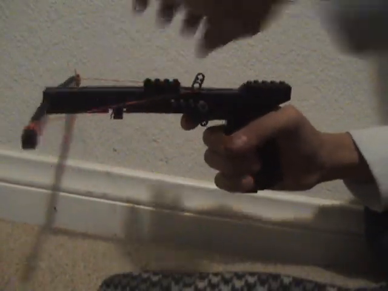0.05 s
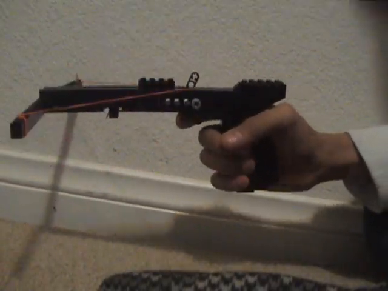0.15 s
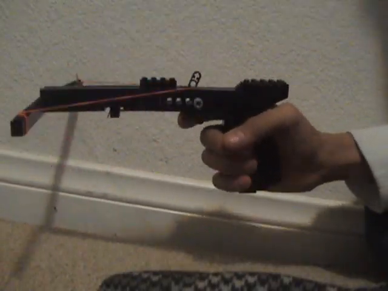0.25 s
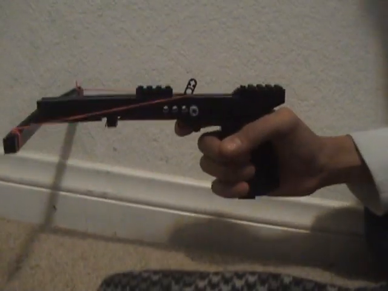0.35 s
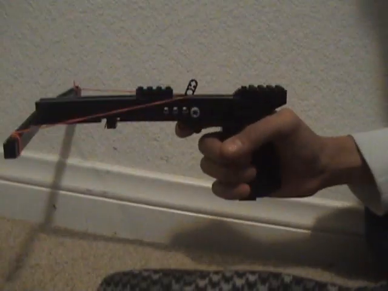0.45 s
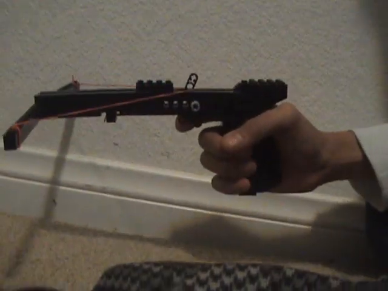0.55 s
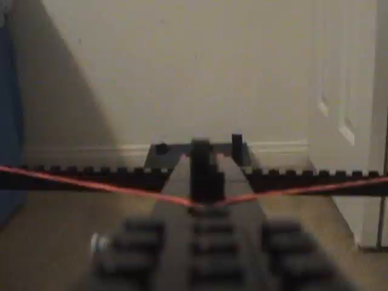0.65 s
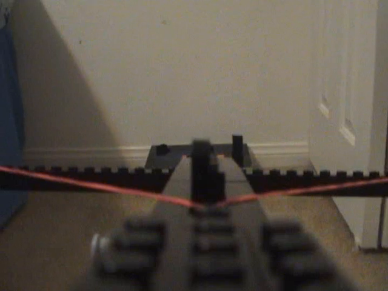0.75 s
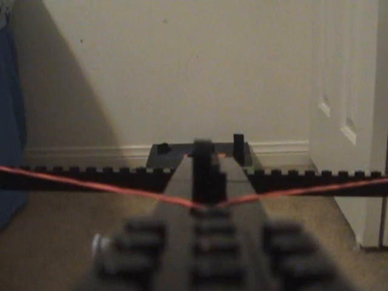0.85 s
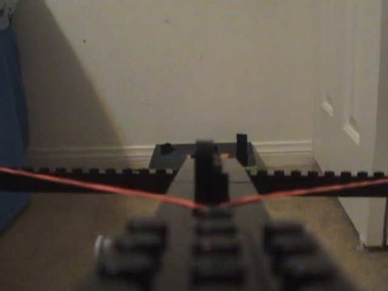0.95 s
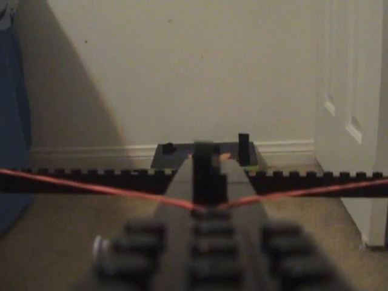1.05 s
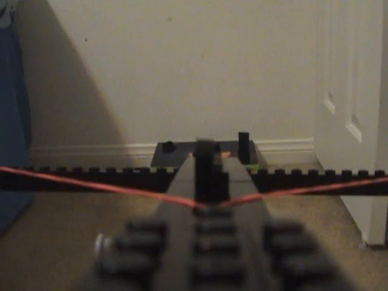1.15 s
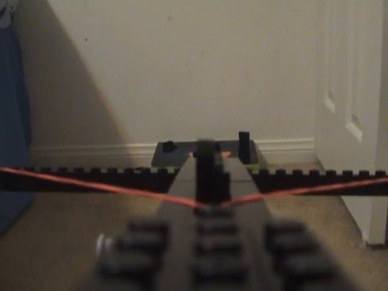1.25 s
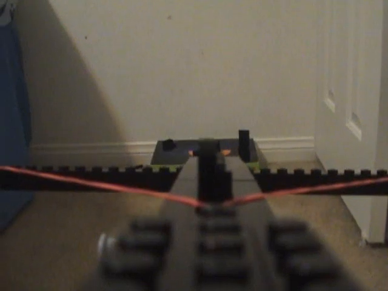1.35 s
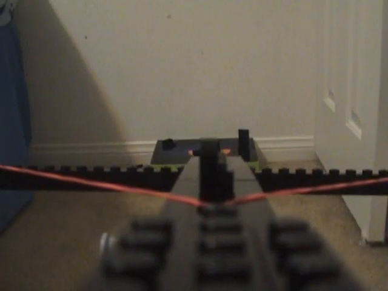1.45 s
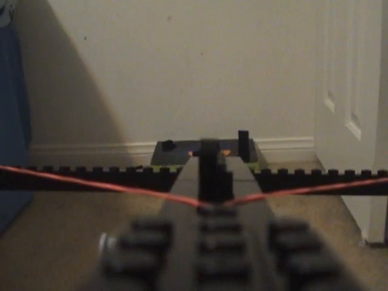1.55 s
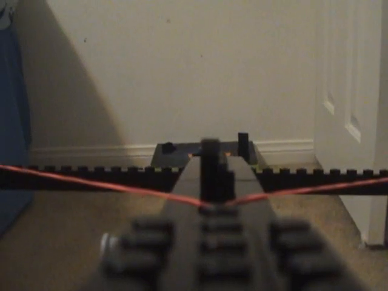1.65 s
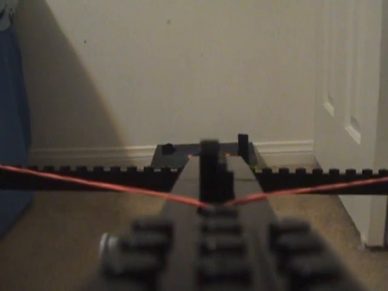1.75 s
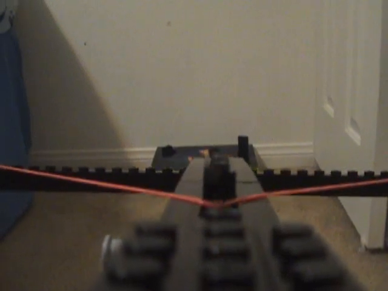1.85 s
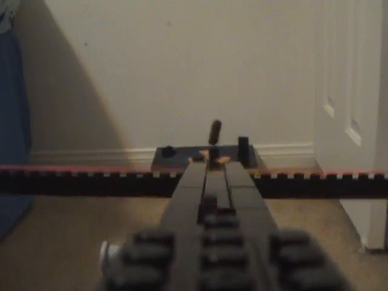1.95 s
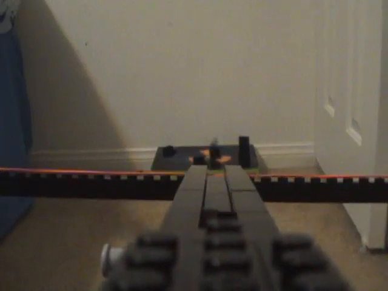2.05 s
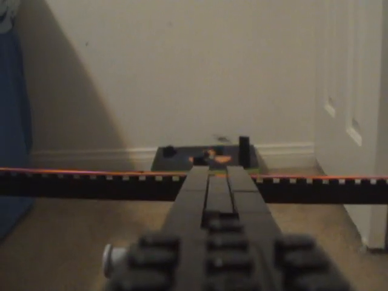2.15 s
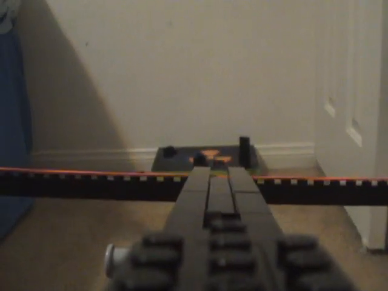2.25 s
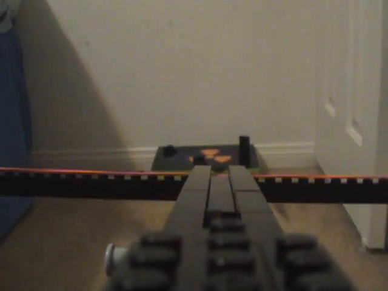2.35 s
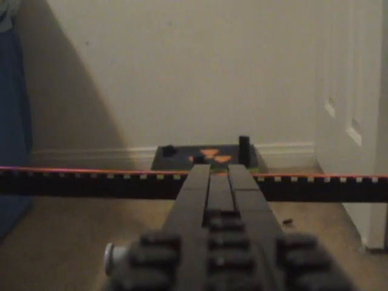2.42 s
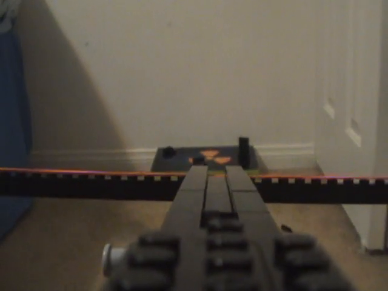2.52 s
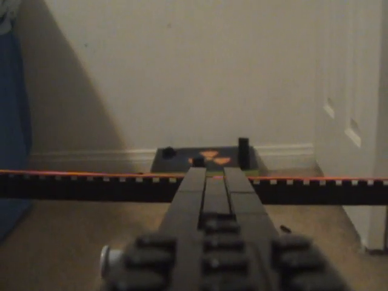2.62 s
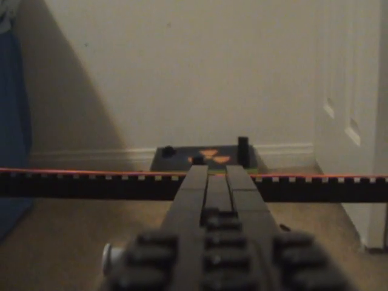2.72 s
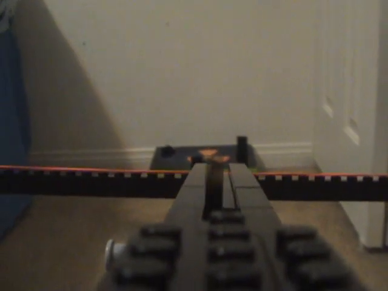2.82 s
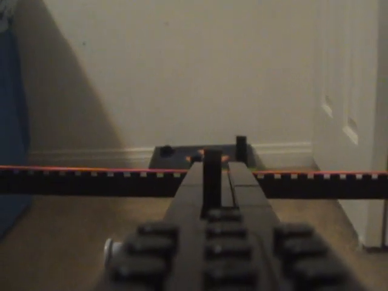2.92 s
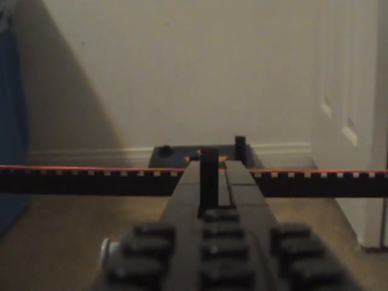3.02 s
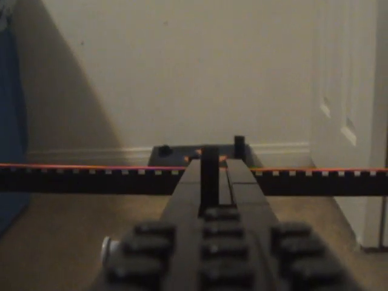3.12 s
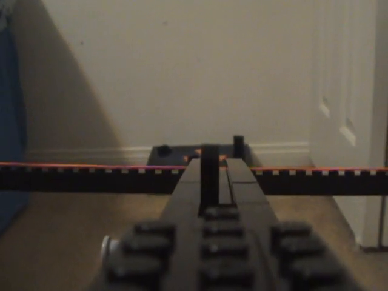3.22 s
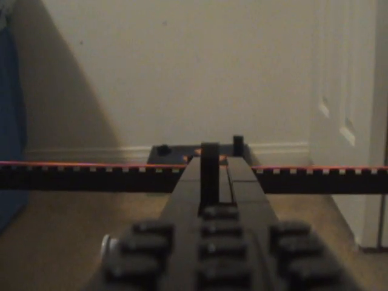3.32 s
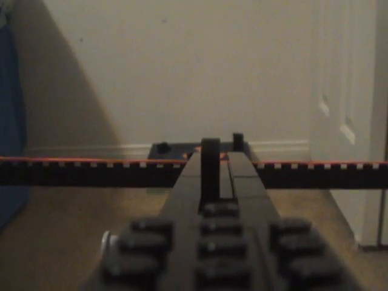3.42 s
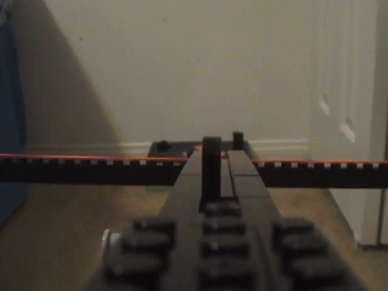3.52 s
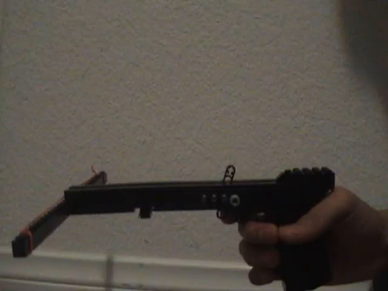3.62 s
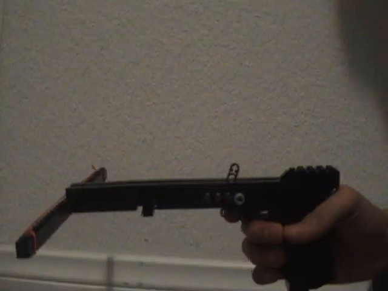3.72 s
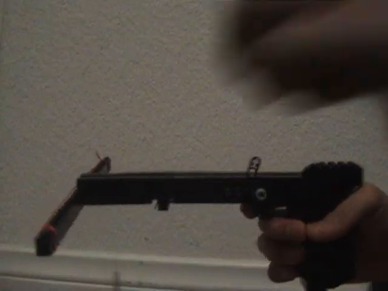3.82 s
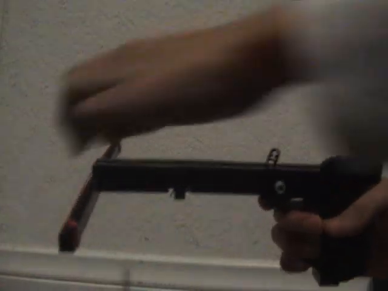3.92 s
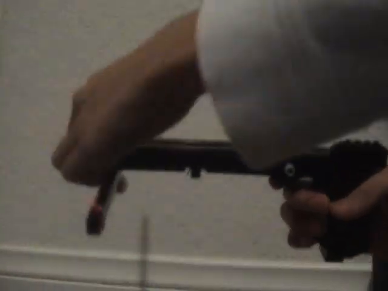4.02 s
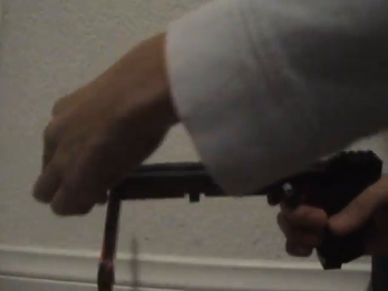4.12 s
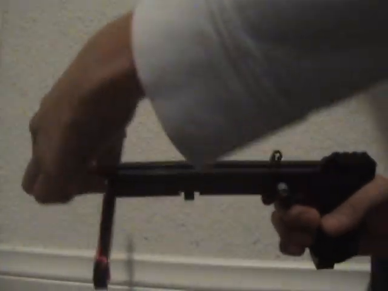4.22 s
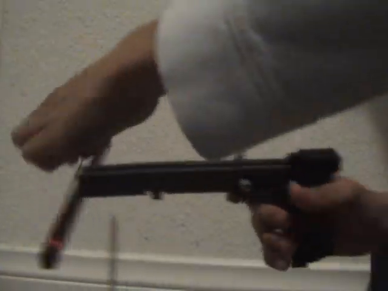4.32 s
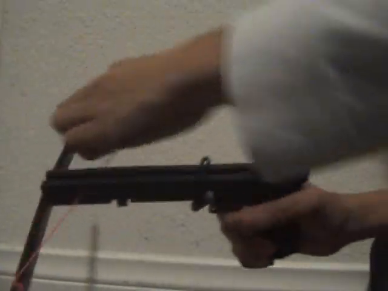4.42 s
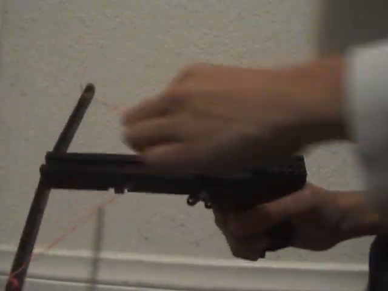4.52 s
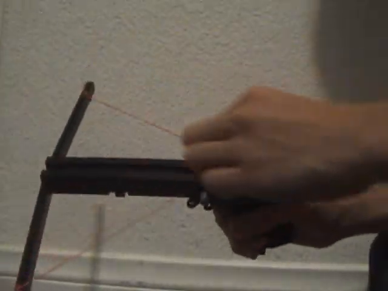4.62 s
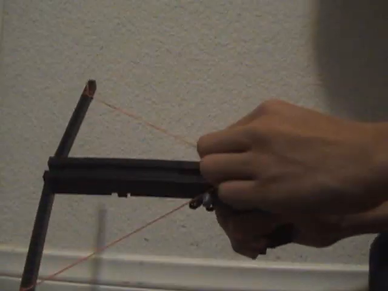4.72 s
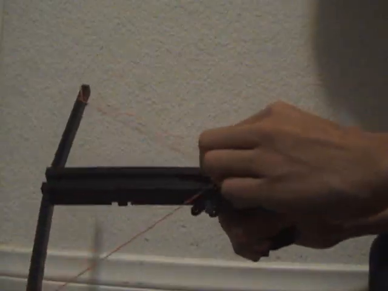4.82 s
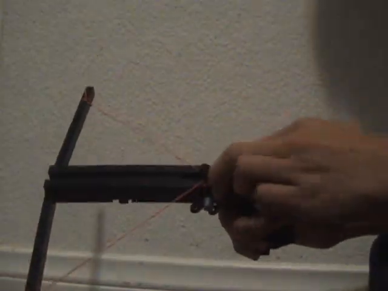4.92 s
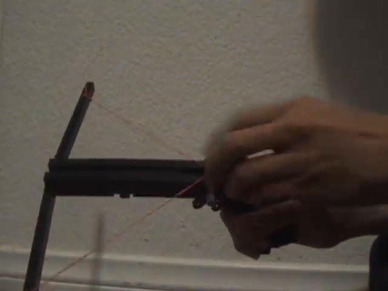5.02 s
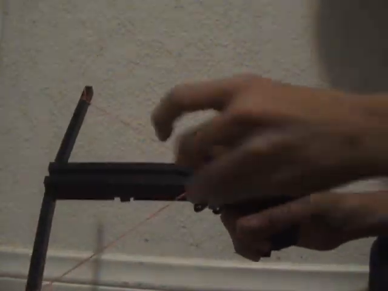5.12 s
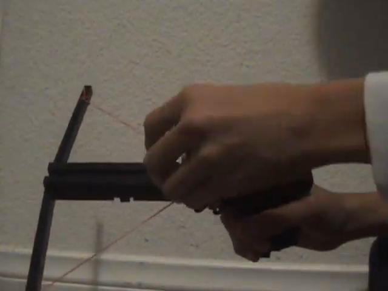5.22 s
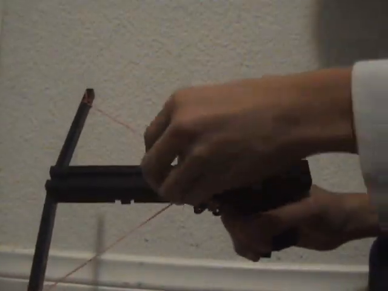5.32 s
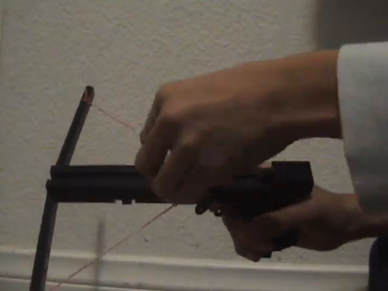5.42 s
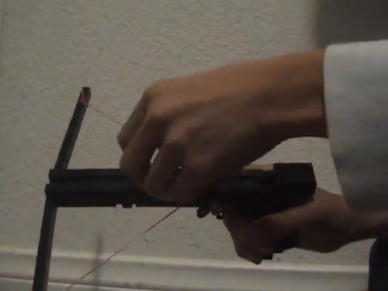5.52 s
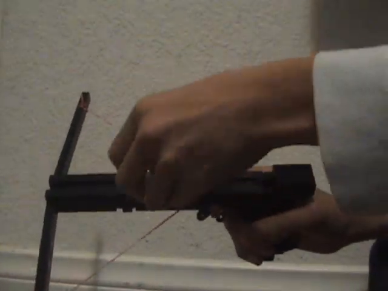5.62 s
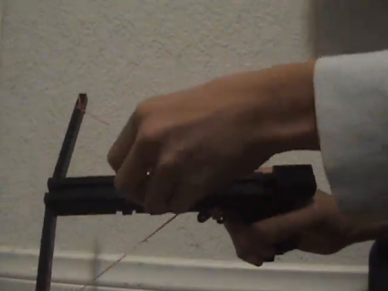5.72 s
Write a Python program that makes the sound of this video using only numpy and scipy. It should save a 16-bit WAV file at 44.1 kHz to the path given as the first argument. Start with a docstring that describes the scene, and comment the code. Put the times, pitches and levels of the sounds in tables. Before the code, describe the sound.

Steady hiss and low rumble of a cheap camera microphone in a small carpeted room. From 0 s, a sleeve rub and light plastic clicks and dull taps; a hard knock with creak at 0.49 s and a clack at 0.68 s. Sound drops out from 0.71 to 0.82 s, returning with a pop. A thin high camera whine lasts until about 1.3 s, then soft rapid focus ticks from 1.5 to 1.85 s. Clicks at 1.84 and 1.91 s lead into a slide and a loud, sharp band slap around 2.0 s, with a faint hum. At 2.2 s plastic bricks crash at the target, bouncing and clattering loudly until 2.55 s, fading by 2.8 s. A strong plastic clack hits at 2.94 s, smaller clicks at 3.5 s. Another brief dropout at 3.71 s. Then sleeve rubs, notably at 4.5 and 5.6 s, and crisp light clicks, the loudest at 5.06 s.

```python
"""A toy crossbow of plastic bricks is handled, fired and cocked again in a small carpeted room.
Over camera hiss and rumble, sleeves rub and fingers click: noise swells and short noise bursts that ring plastic.
The camera whines (sines), pauses, then its focus motor ticks (dying sines).
The bolt slides, the band slaps the bow and hums, and the target bricks scatter, bounce and clatter.
More clicks and rubs follow as the bow is cocked, with a second pause on the way."""
import sys
import numpy as np
from scipy import signal
from scipy.fft import rfft, irfft, next_fast_len
from scipy.io import wavfile

SR = 44100
rng = np.random.default_rng(int(sys.argv[2]) if len(sys.argv) > 2 else 0)


def waveform_to_disk(signal):
    """Save audio, clipped to [-1, 1], as 16-bit WAV at the path in sys.argv[1]."""
    frames = np.transpose(np.atleast_2d(signal))
    scaled = np.clip(frames, -1, 1) * 32767
    samples = np.round(scaled).astype(np.int16)
    wavfile.write(sys.argv[1], SR, samples)


N = 254456

# Steady hiss and rumble of room and camera, as relative strength: pitch_hz, level_db (per Hz)
FLOOR_SPECTRUM = [(25, -26), (50, -12), (80, -14.5), (125, -4), (170, -14), (230, -14), (400, -16),
                  (1000, -20), (2000, -26.5), (2550, -25), (3500, -30.5), (7000, -36), (11000, -37.5),
                  (16000, -43.5)]
# How alike left and right are (1 same, 0 unrelated, -1 opposite; clipped there): pitch_hz, likeness
FLOOR_LIKENESS = [(60, 0.35), (150, 0.46), (380, -0.79), (950, -0.65), (2380, -0.43), (5980, 0.28),
                  (15000, -1.8)]
# How much louder the left is than the right in banded noise: pitch_hz, left_over_right_db
NOISE_BALANCE = [(60, 2.0), (200, 2.5), (400, 1.26), (8000, -1.4)]
# Tone of rubbing cloth, as relative strength: pitch_hz, level_db (per Hz)
CLOTH_SPECTRUM = [(400, -27), (900, -2), (2000, -1), (3800, -1.5), (6300, -1), (8000, -8.5), (12000, -22),
                  (16000, -37)]
# Sleeve and skin rubbing, each a bell-shaped swell: middle_s, cloth_db, skin_db, half_width_s
RUBS = [(.05, -49, -60, 0.053), (.4, -60.5, -66, 0.13), (1.59, -56.5, -64, 0.056), (3.57, -55, -58, .04),
        (4.03, -64, -61, .03), (4.12, -54, -66, .04), (4.22, -51, -56, .03), (4.52, -44, -64, .045),
        (4.71, -57, -57, .025), (5.04, -55, -68, 0.14), (5.21, -59.5, -58, .025), (5.45, -54, -66, 0.023),
        (5.58, -44, -60, 0.018), (5.71, -52.5, -60, .03)]
# The three tables of blows share their columns: start_s, peak_db, pitch_hz, thud_db, tick_db
# (peak is for the middle bands, before their loss away from the pitch; thud and tick are rms of the attack)
# Finger clicks and knocks on the frame
HANDLING_BLOWS = [(0.08, -34, 2500, -62, -49), (0.114, -37, 3100, -66, -52), (0.252, -32, 700, -30, -67),
                  (0.266, -37, 700, -28, -61), (0.296, -50, 700, -37, -60), (0.403, -43, 700, -56, -73),
                  (0.489, -6, 1450, -22, -22), (0.51, -29, 985, -33, -63), (0.552, -28, 1110, -40, -47),
                  (0.605, -33, 2120, -58, -63), (0.633, -36, 2120, -47, -60), (0.68, -15, 2170, -43, -29),
                  (1.15, -42, 670, -47, -66), (1.438, -31, 2380, -62, -49), (1.557, -32.5, 1200, -46, -58),
                  (1.775, -38, 1150, -48, -72), (1.839, -19, 2510, -58, -32), (1.913, -15, 2640, -39, -39),
                  (2.873, -41, 1430, -61, -51), (2.892, -38, 1390, -64, -51), (2.912, -23, 1850, -39, -46),
                  (2.939, -4, 1100, -60, -29), (2.958, -24, 2260, -60, -50), (3.312, -45, 1500, -45, -64),
                  (3.466, -29.5, 1170, -39, -61), (3.501, -16, 2300, -38, -39), (3.521, -20, 830, -25, -35),
                  (3.541, -28, 2100, -58, -71), (3.673, -25, 2350, -51, -54), (3.684, -18, 3750, -51, -28),
                  (3.824, -17, 6770, -55, -32), (3.956, -44, 711, -46, -70), (4.029, -44, 719, -58, -70),
                  (4.159, -26, 6290, -74, -40), (4.247, -30, 4060, -55, -41), (4.263, -24, 3800, -62, -42),
                  (4.312, -24, 6430, -53, -39), (4.696, -42, 1280, -56, -70), (4.714, -25, 4700, -65, -39),
                  (4.795, -35, 5530, -62, -52), (4.936, -32, 4540, -55, -45), (5.0645, -7, 5870, -57, -21),
                  (5.141, -30.5, 3310, -61, -41), (5.197, -44, 934, -66, -59), (5.363, -39, 2030, -50, -56),
                  (5.444, -34, 3830, -59, -52), (5.563, -27, 3340, -65, -38), (5.575, -23, 3230, -70, -43),
                  (5.69, -36, 3230, -55, -50), (5.702, -28.5, 4680, -50, -43)]
# Catch, sliding bolt and band slapping the bow
RELEASE_BLOWS = [(1.942, -18, 1391, -44, -33), (1.966, -1, 3140, -33, -14), (1.981, -8.5, 4500, -53, -24),
                 (2.011, 2, 2517, -28, -16), (2.016, 4, 2050, -32, -12), (2.025, -2.5, 4100, -41, -17),
                 (2.038, -7, 2000, -44, -31)]
# Bolt and bricks landing across the room
LANDING_BLOWS = [(2.194, 1, 2996, -27, -8), (2.201, 1, 6580, -34, -22), (2.215, -1, 3030, -32, -14),
                 (2.23, 0, 3600, -33, -23), (2.238, -1, 2900, -32, -28), (2.247, -4, 3300, -41, -34),
                 (2.26, -2, 3220, -34, -29), (2.287, -6, 2470, -27, -28), (2.321, 4, 5810, -35, -13),
                 (2.342, 1, 7000, -47, -17), (2.361, -4, 980, -24, -15), (2.375, -4, 2490, -38, -33),
                 (2.411, -8, 2520, -46, -19), (2.447, -2, 2540, -32, -14), (2.521, -4, 2740, -32, -17),
                 (2.544, -11, 5500, -36, -27), (2.588, -22, 1970, -30, -41), (2.611, -25, 1890, -53, -44),
                 (2.658, -33.5, 1200, -51, -62), (2.685, -26, 1950, -47, -46), (2.707, -32, 1950, -60, -56),
                 (2.748, -36, 1980, -61, -55), (2.818, -41, 1061, -50, -60)]
# Ringing tones of the crossbow frame: pitch_hz, level_db (relative), t60_s (time to fall 60 dB)
FRAME_MODES = [(200, -2, .06), (290, 0, .05), (420, -8, .04), (1063, 0, .02), (1700, -4, .012),
               (2100, -3, .014), (2570, -1, .014), (3300, -2, .01), (3900, -2, .01), (4800, -3, .006),
               (5700, -4, .005), (6590, -4, .01)]
# Ringing tones of the loose bricks: pitch_hz, level_db (relative), t60_s
BRICK_MODES = [(130, -5, .12), (217, -2, .08), (1000, -3, .04), (1900, -4, .04), (2495, 0, .05),
               (2740, 0, .03), (3050, -2, .02), (3700, -2, .015), (5500, -6, .035), (5800, -6, .03),
               (6580, -3, .035), (7050, -5, .03), (8150, -5, .03)]
# Thud, knock, clack and tick bands of a contact: low_hz, high_hz
BANDS_HZ = [(100, 650), (650, 1500), (1500, 4000), (4000, 16000)]
# Share of each of those bands that differs between the ears: one share a band
BAND_WIDTHS = [.33, .24, .16, .45]
# Range of skin noise: low_hz, high_hz
SKIN_HZ = [600, 1800]
# Camera whines: start_s, end_s, pitch_hz, level_db (rms, before a slow wobble)
WHINES = [(0.38, 0.71, 10110, -70), (0.83, 1.275, 10110, -60), (0.89, 0.925, 7865, -66),
          (0.925, 0.96, 6573, -57), (0.83, 1.90, 2525, -67), (2.7, 3.5, 2525, -71),
          (3.845, 3.865, 6573, -53), (3.80, 4.025, 10110, -63)]
# One run of focus motor steps: first_s, interval_s, first_pitch_hz, peak_db (before variation), t60_s
FOCUS_STEPS = (1.491, 0.0337, 2530, -41.0, .014)
# Parts creaking and sliding: loudest_s, drive_db, swell_s, fade_s (each the time for 30 dB)
CREAKS = [(.487, -28, .008, .05), (.56, -39, .04, 0.01), (.678, -40.5, 0.14, 0.04), (1.912, -35, .02, .01),
          (1.965, -28, 0.0644, .2), (2.02, -20, .02, 0.1), (2.914, -34, .04, 0.0366),
          (2.938, -30, 0.01, .08)]
# Tones of the stretched band after the slap: pitch_hz, peak_db (before a wobble), t60_s
BAND_TONES = [(300, -45, .4), (544, -34, .8), (1814, -39, .4)]
# Bricks tumbling, joined by straight lines: time_s, drive_db, treble_db (relative)
TUMBLE = [(2.196, -25.5, 4), (2.24, -19, -3), (2.3, -21, -8), (2.325, -25, 4), (2.46, -27, 1.5),
          (2.56, -36, -1.5), (2.6, -41, -1.5), (2.64, -52, -5), (2.78, -55, -4), (2.85, -66, -9)]
# Camera pauses: stop_s, hiss_end_s, return_s, fade_in_s
PAUSES = [(0.710, 0.762, 0.824, .02), (3.710, 3.738, 3.796, .006)]

FLOOR_DB = -47  # rms
SOFT_HZ, HIGH_IS_HARDER = 6000, .6  # top of a contact on a 2.5 kHz part; it rises with this power of the pitch
THIN_BELOW = .7  # a part radiates little under this share of its pitch
ABOVE_DB_PER_OCT = 7.5  # fall of a blow's middle bands above its pitch
THUD_HZ = 300  # the hand or the carpet behind a blow keeps its thud deep
# How long a contact chatters on a 2 kHz part; lower parts chatter longer by this power of the pitch
TAP_T60_S, SLAP_T60_S, LANDING_T60_S, LOW_LINGERS = .018, .1, .15, .4
TAP_BELOW_DB, SLAP_BELOW_DB, LANDING_BELOW_DB = 16, 12, 25  # fall per octave of the middle bands below the pitch
ROOM_T60_S, WALL_CUT_HZ = 0.19, 14000
FOCUS_SAG_HZ = 17  # each focus step rings this much lower than the last
SLAP_S = 2.02
FAR_CUT_HZ = 8500  # distance and carpet dull the target
PREAMP_HISS_DB, OVERLOAD = -66.0, .92
PAUSE_HISS_DB = -68.0  # before smoothing
POP_S, POP_DB = 0.8218, -14.0
CUTOFF_HZ = 16500  # 60 dB down from here up
BAND_FILTERS = [signal.butter(3, edges, "band", fs=SR, output="sos") for edges in BANDS_HZ]


def from_db(db):
    """Turn a level in dB into a gain."""
    return 10 ** (np.asarray(db) / 20)


def rms_one(x):
    """Scale a sound to rms 1."""
    return x / np.sqrt(np.mean(x ** 2) + 1e-20)


def in_time(rows, column):
    """Join a table column by straight lines; it is very low outside the table."""
    rows = np.array(rows)
    return np.interp(np.arange(N) / SR, rows[:, 0], rows[:, column], left=-120, right=-120)


def at_hz(points, hz):
    """Read a spectrum between its points, with pitch on a log axis."""
    points = np.array(points)
    return np.interp(np.log(hz), np.log(points[:, 0]), points[:, 1])


def sides(pan_db):
    """Left and right gains; a positive level difference favours the left."""
    return from_db(np.array([[.5], [-.5]]) * pan_db)


def drift(rate_hz):
    """Slow random wander of rms 1, made at every 40th sample and joined up."""
    r = np.exp(-80 * np.pi * rate_hz / SR)
    warm_up = 2000
    noise = rng.standard_normal(N // 40 + 2 + warm_up)
    slow = signal.lfilter([1], [1, -2 * r, r * r], noise)[warm_up:]
    return np.interp(np.arange(N) / 40, np.arange(len(slow)), rms_one(slow))


def ring(x, hz, t60):
    """A resonance: a unit click sets a dying sine of height 1 ringing."""
    r = from_db(-60 / (t60 * SR))
    w = 2 * np.pi * hz / SR
    return signal.lfilter([0, np.sin(w)], [1, -2 * r * np.cos(w), r * r], x + 1e-18)


def gritty(shape, grit_db):
    """Noise whose samples vary widely in size, as many small contacts do."""
    return rng.standard_normal(shape) * from_db(grit_db * rng.standard_normal(shape))


def banded_noise(spectrum, patchy_db, likeness):
    """Third-octave bands of stereo noise, each with its own level, flicker and likeness; rms 1."""
    out = 0
    together = drift(2.0)
    edges = 22 * 2 ** (np.arange(30) / 3)
    white = rng.standard_normal((2, 2, N))  # neighbouring bands get unrelated noise
    for k, (low, high) in enumerate(zip(edges, edges[1:])):
        if high < .8 * spectrum[0][0]:
            continue
        third_octave = signal.butter(2, [low, high], "band", fs=SR, output="sos")
        mid, side = signal.sosfilt(third_octave, white[k % 2])
        hz = np.sqrt(low * high)
        alike = np.clip(at_hz(likeness, hz), -1, 1)
        flicker_db = patchy_db * (.7 * together + drift(14.0))
        gain = from_db(at_hz(spectrum, hz) + flicker_db) * sides(at_hz(NOISE_BALANCE, hz))
        out = out + gain * (np.sqrt(1 + alike) * mid + np.sqrt(1 - alike) * side * [[1], [-1]])
    return rms_one(out)


def floor_noise():
    """Room and camera hiss and rumble: flickering noise that lasts throughout."""
    return from_db(FLOOR_DB) * banded_noise(FLOOR_SPECTRUM, 1.1, FLOOR_LIKENESS)


def rubbing():
    """Cloth noise and a duller, grainier skin noise under bell-shaped swells."""
    t = np.arange(N) / SR
    cloth, skin = np.zeros(N), np.zeros(N)
    for middle, cloth_db, skin_db, half_width in RUBS:
        swell = np.exp(-.5 * ((t - middle) / half_width) ** 2)
        cloth += from_db(cloth_db) * swell
        skin += from_db(skin_db) * swell
    skin_filter = signal.butter(2, SKIN_HZ, "band", fs=SR, output="sos")
    grain = rms_one(signal.sosfilt(skin_filter, gritty(N, grit_db=5.0)))
    cloth_noise = banded_noise(CLOTH_SPECTRUM, 1.5, [(500, .6), (9000, .5)])
    return cloth * cloth_noise + skin * from_db(3.0 * drift(30.0)) * grain


def split(x, struck_hz):
    """Thud, knock, clack and tick bands; plastic is soft, so the top slopes off."""
    top_hz = min(SOFT_HZ * (struck_hz / 2500) ** HIGH_IS_HARDER, 16000)
    soft = signal.lfilter(*signal.butter(3, top_hz, fs=SR), x)
    return [signal.sosfilt(band_filter, soft) for band_filter in BAND_FILTERS]


def body(x, modes, ring_db, struck_hz, focus_db):
    """The contact, coloured by the struck part, plus the modes; those far from its pitch answer less."""
    out = x + from_db(-9.5) * ring(x, struck_hz, 2.4 / struck_hz)  # a broad hump, a few cycles long
    for k, (hz, db, t60) in enumerate(modes):
        octaves_off = min(abs(np.log2(hz / struck_hz)), 1)
        gain = from_db(ring_db + db - focus_db * octaves_off)
        out = out + (-1) ** k * gain * ring(x, hz, t60)
    return out


def spread(x, modes, ring_db, struck_hz, focus_db):
    """Bands of a shared and a differing contact noise, ringing the body, as left and right."""
    bands = split(body(x, modes, ring_db, struck_hz, focus_db), struck_hz)
    return [mid + wide * side * [[1], [-1]] for (mid, side), wide in zip(bands, BAND_WIDTHS)]


def attack_rms(x):
    """Level of the first 6 ms, with left and right averaged."""
    return np.sqrt(np.mean(x[:, :SR * 6 // 1000].mean(axis=0) ** 2))


def blows(table, modes, t60, below_db, ring_db, focus_db, crack_db, pan_db=-0.8):
    """Each blow is a sharp crack and a dying burst of micro-contacts into the body."""
    size = round(SR * (.06 + t60))
    out = np.zeros((2, N + size))
    t = np.arange(size) / SR
    for start, peak_db, hz, thud_db, tick_db in table:
        chatter_t60 = max(t60 * (2000 / hz) ** LOW_LINGERS, .002)
        crack = from_db(crack_db - t / 0.00024)  # the first millisecond is the hardest
        fade = from_db(-60 * t / chatter_t60) + crack
        contacts = gritty((2, size), grit_db=0.0) * fade
        thud, knock, clack, tick = spread(contacts, modes, ring_db, hz, focus_db)
        thud = signal.lfilter(*signal.butter(1, THUD_HZ, fs=SR), thud)
        mix = from_db(thud_db) * thud / attack_rms(thud) + from_db(tick_db) * tick / attack_rms(tick)
        for part, (low, high) in zip((knock, clack), BANDS_HZ[1:3]):
            loss_db = below_db * max(np.log2(hz / high), 0) + ABOVE_DB_PER_OCT * max(np.log2(low / hz), 0)
            part = signal.lfilter(*signal.butter(2, THIN_BELOW * hz, "high", fs=SR), part)
            mix += from_db(peak_db - loss_db) * part / np.abs(part.mean(axis=0)).max()
        at = round(start * SR)
        out[:, at:at + size] += sides(pan_db) * mix
    return out[:, :N]


def handling():
    """Fingers click and knock on the frame: short contacts that ring it a little."""
    return blows(HANDLING_BLOWS, FRAME_MODES, TAP_T60_S, TAP_BELOW_DB,
                 ring_db=-15.0, focus_db=12.5, crack_db=5.0)


def room(x):
    """Echoes from six feedback delays a side, duller on every round, worked out as spectra."""
    size = next_fast_len(N + SR)
    w = 2 * np.pi * np.arange(size // 2 + 1) / size
    dull = 1 / (1 + 1j * w * SR / (2 * np.pi * WALL_CUT_HZ))
    out = np.zeros((2, size // 2 + 1), complex)
    for k, lag in enumerate(np.geomspace(.007, .029, 12) * SR):  # seconds to samples
        loop = from_db(-60 * lag / SR / ROOM_T60_S) * dull * np.exp(-1j * w * round(lag))
        out[k % 2] += (-1) ** (k // 2) * loop / (1 - loop)
    return irfft(out * rfft(x.mean(axis=0), size), size)[:, :N]


def camera():
    """Steady whines of the drive circuits, as sines, and a run of focus steps, as dying sines."""
    t, out = np.arange(N) / SR, np.zeros(N)
    for start, end, hz, db in WHINES:
        gate = np.clip(np.minimum(t - start, end - t) / .004, 0, 1)
        level = np.sqrt(2) * from_db(db + 1.5 * drift(20.0))
        out += level * gate * np.sin(2 * np.pi * hz * t)
    first, interval, hz, db, t60 = FOCUS_STEPS
    since = t[:SR // 20]
    for k, (late, gain_db) in enumerate(rng.normal(0, [.0015, 1.5], (11, 2))):
        at = round((first + interval * k + late) * SR)
        tone = np.sin(2 * np.pi * (hz - FOCUS_SAG_HZ * k) * since)
        out[at:at + len(since)] += from_db(db + gain_db - 60 * since / t60) * tone
    return out


def rattle(drive_db, modes, grit_db, ring_db, thud_db, knock_db, tick_db):
    """Dense uneven contacts of loose parts ringing the body, made only while they are heard."""
    heard = drive_db > -90
    out = np.zeros((2, N))
    contacts = gritty((2, heard.sum()), grit_db)
    bands = spread(contacts, modes, ring_db, struck_hz=3200, focus_db=0)
    thud, knock, clack, tick = map(rms_one, bands)
    tick = from_db(np.broadcast_to(tick_db, N)[heard]) * tick
    low = from_db(thud_db) * sides(2.7) * thud + from_db(knock_db) * knock
    out[:, heard] = low + sides(-0.89) * (clack + tick)
    return from_db(drive_db + 2.0 * drift(90.0)) * out


def creaking():
    """Parts slide on each other: rough contacts that swell and fade at steady rates in dB."""
    t = np.arange(N) / SR
    swells_db = [db - 30 * np.maximum((loudest - t) / swell, (t - loudest) / fade)
                 for loudest, db, swell, fade in CREAKS]
    return rattle(np.max(swells_db, axis=0), FRAME_MODES, grit_db=8.5,
                  ring_db=-33,  # held parts hardly ring
                  thud_db=-8.5, knock_db=-3.5, tick_db=-2.5)


def release():
    """Catch, bolt and band strike the frame: contacts that chatter longer than finger clicks."""
    return blows(RELEASE_BLOWS, FRAME_MODES, SLAP_T60_S, SLAP_BELOW_DB,
                 ring_db=-39.5, focus_db=19.0, crack_db=3.0)


def band():
    """The slap leaves the rubber band humming unevenly: a click rings a few low tones."""
    slap = np.zeros(N)
    slap[round(SLAP_S * SR)] = 1
    return sum(from_db(db + 2.0 * drift(25.0)) * ring(slap, hz, t60) for hz, db, t60 in BAND_TONES)


def landings():
    """Bolt and bricks land: long bursts of contacts that ring the loose bricks."""
    return blows(LANDING_BLOWS, BRICK_MODES, LANDING_T60_S, LANDING_BELOW_DB,
                 ring_db=-19.0, focus_db=18.5, crack_db=6.5)


def tumbling():
    """Bricks clatter over each other: dense contacts whose level and treble follow a table."""
    return rattle(in_time(TUMBLE, 1), BRICK_MODES, grit_db=4.5,
                  ring_db=-40,  # tumbling bricks damp each other
                  thud_db=-4.5, knock_db=-13.0, tick_db=in_time(TUMBLE, 2))


def scene():
    """Near handling is nearly dry; the far target is duller and sends a little less to the room."""
    near = handling() + creaking() + release() + band()
    far = landings() + tumbling()
    far = signal.lfilter(*signal.butter(2, FAR_CUT_HZ, fs=SR), far)
    echoes = room(from_db(-22.5) * near + from_db(-25.0) * far)
    return floor_noise() + rubbing() + near + far + echoes + camera()


def record(dry):
    """The preamp hisses and clips; sound drops out at each pause, a pop ends the first; the top is cut."""
    t, gate, faint = np.arange(N) / SR, np.ones(N), np.zeros(N)
    for stop, hiss_end, back, fade in PAUSES:
        gate *= np.clip(np.maximum((stop - t) / .002, (t - back) / fade), 0, 1)
        faint += (t > stop) & (t < hiss_end)
    pop = -from_db(POP_DB) * np.exp(-.5 * ((t - POP_S) / 3.5e-5) ** 2)
    shared, left, right = rng.standard_normal((3, N))
    preamp = from_db(PREAMP_HISS_DB) * (.85 * shared + .5 * np.array([left, right]))
    idle = signal.lfilter([.3], [1, -.7], rng.standard_normal((2, N)))  # smoothed, so duller
    clipped = np.clip(dry + preamp, -OVERLOAD, OVERLOAD)
    out = gate * clipped + from_db(PAUSE_HISS_DB) * faint * idle + pop
    return signal.sosfilt(signal.cheby2(20, 60, CUTOFF_HZ, fs=SR, output="sos"), out)


dry = scene()
out = record(dry)
waveform_to_disk(out)
```